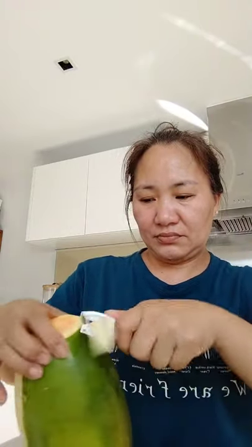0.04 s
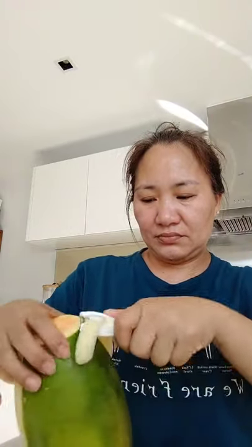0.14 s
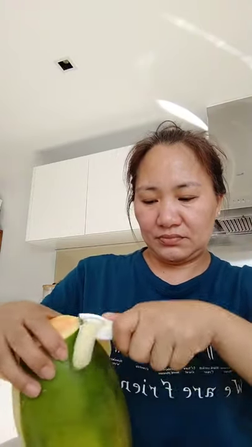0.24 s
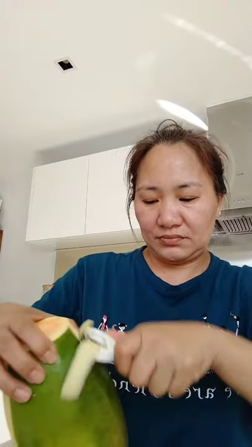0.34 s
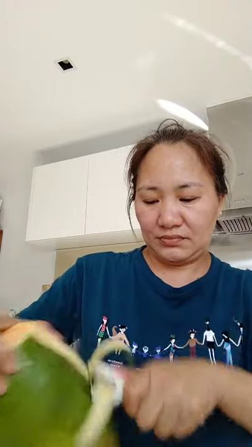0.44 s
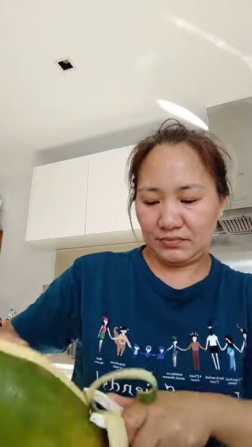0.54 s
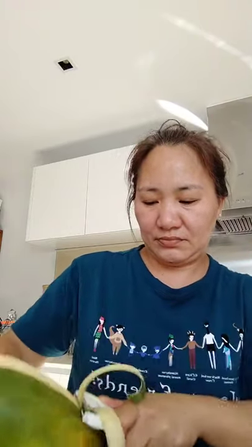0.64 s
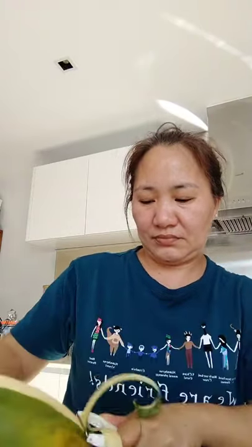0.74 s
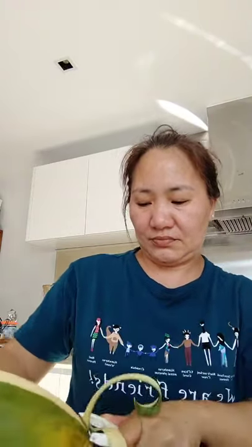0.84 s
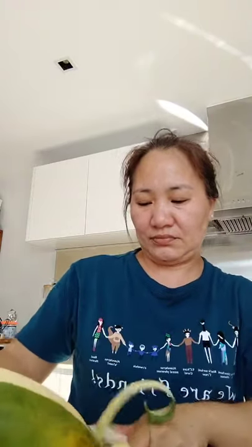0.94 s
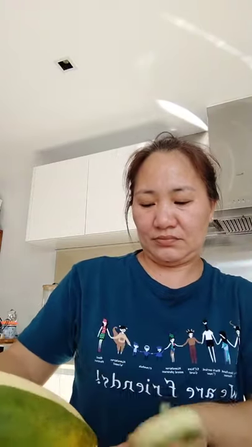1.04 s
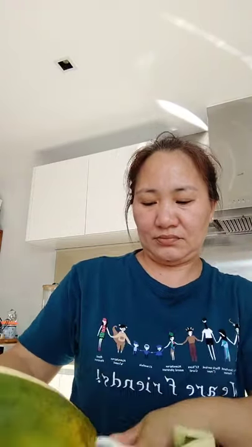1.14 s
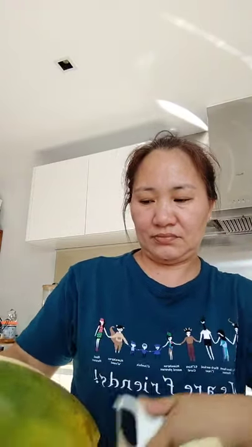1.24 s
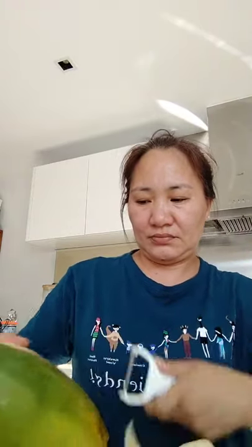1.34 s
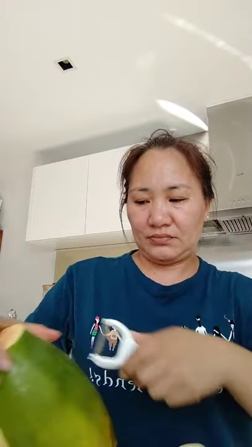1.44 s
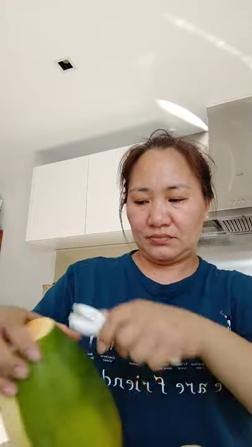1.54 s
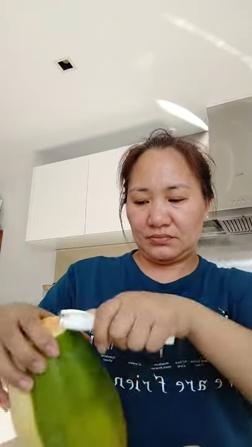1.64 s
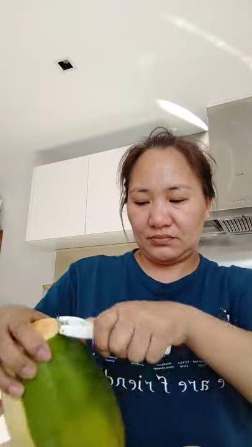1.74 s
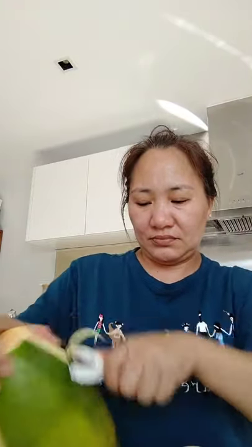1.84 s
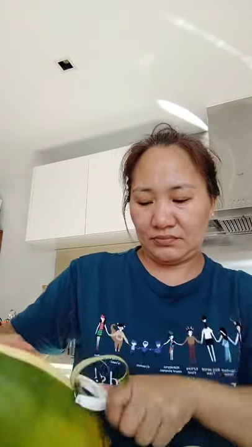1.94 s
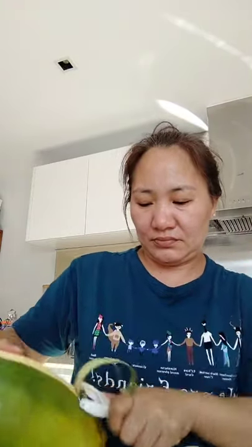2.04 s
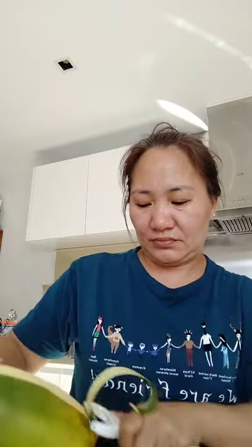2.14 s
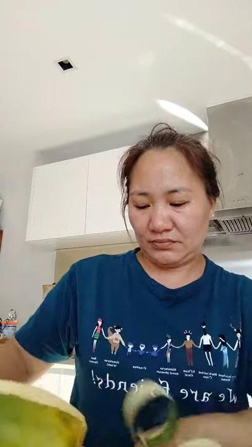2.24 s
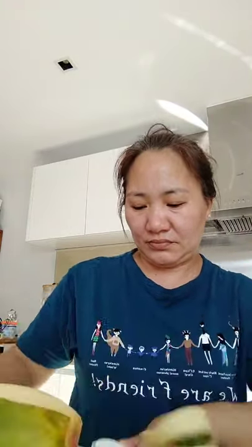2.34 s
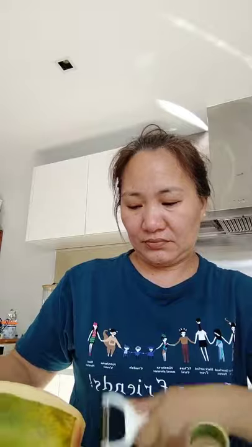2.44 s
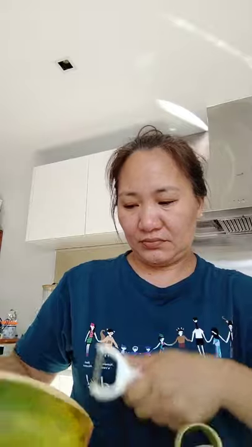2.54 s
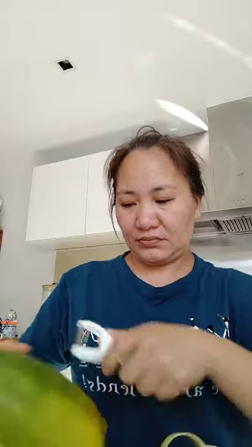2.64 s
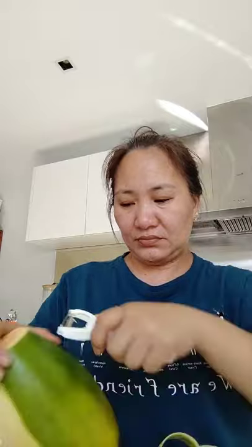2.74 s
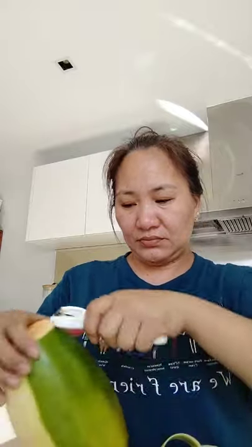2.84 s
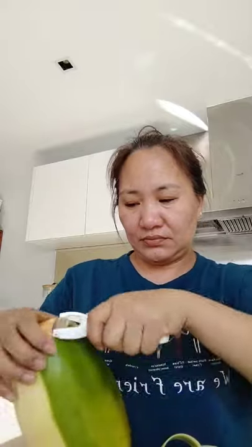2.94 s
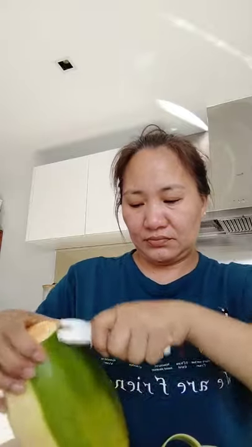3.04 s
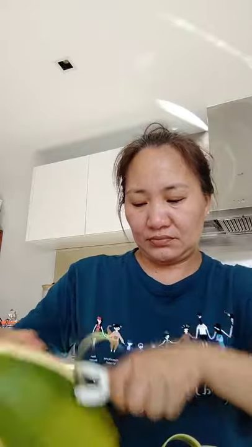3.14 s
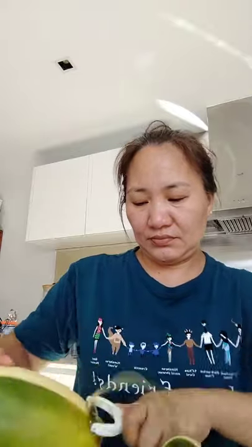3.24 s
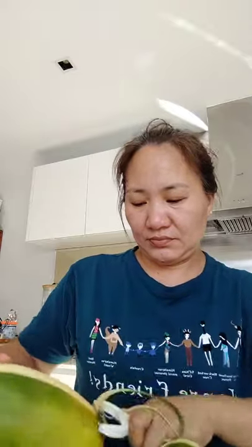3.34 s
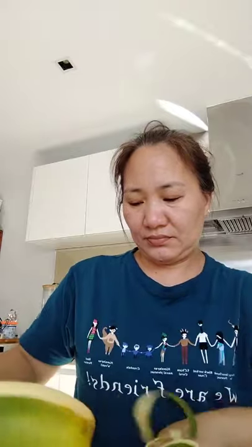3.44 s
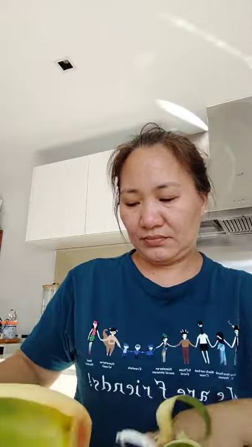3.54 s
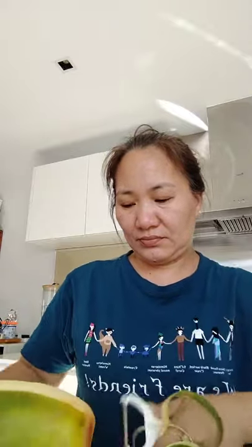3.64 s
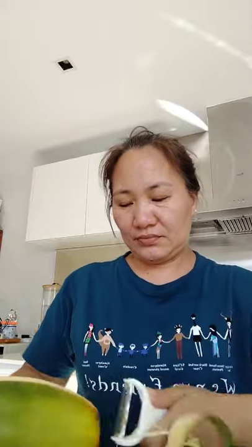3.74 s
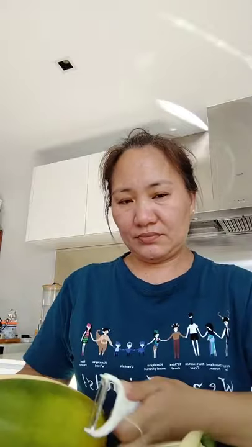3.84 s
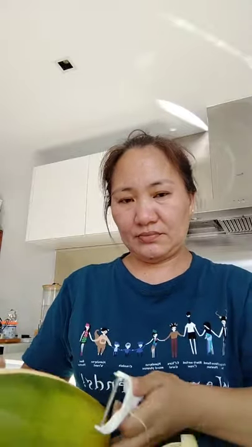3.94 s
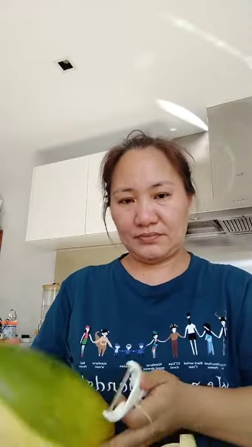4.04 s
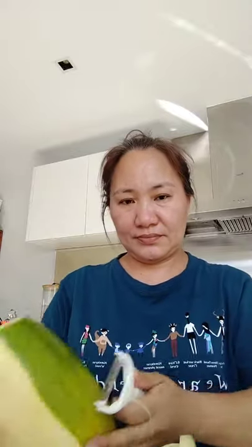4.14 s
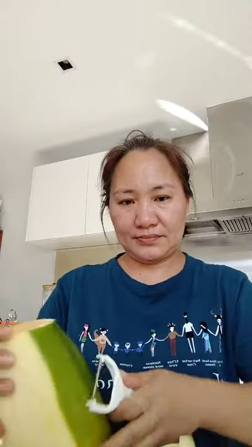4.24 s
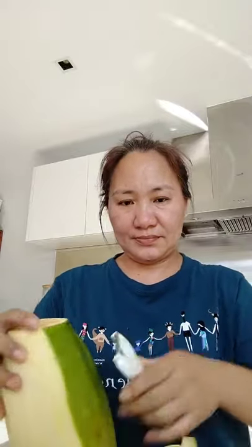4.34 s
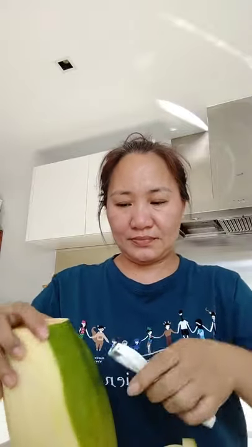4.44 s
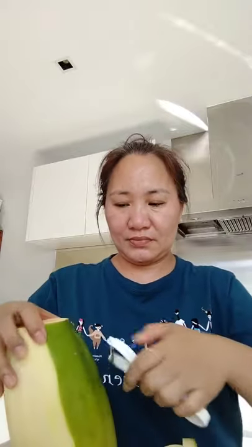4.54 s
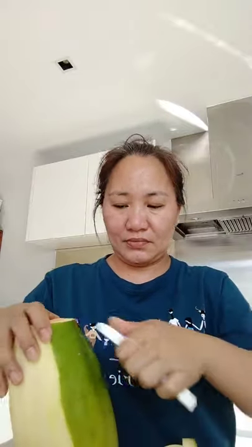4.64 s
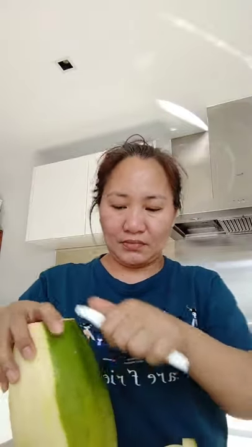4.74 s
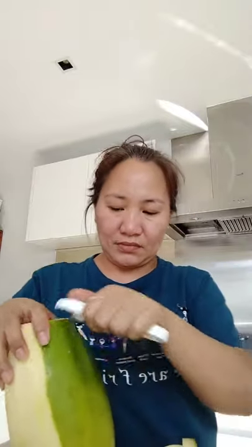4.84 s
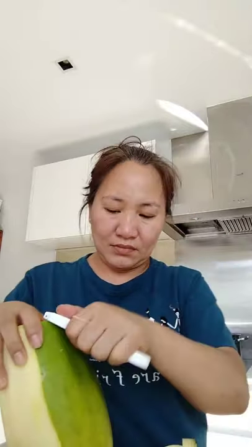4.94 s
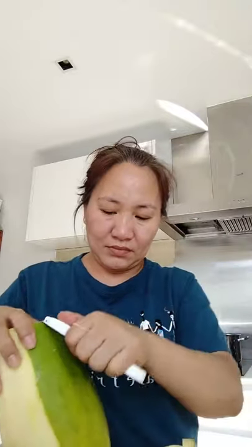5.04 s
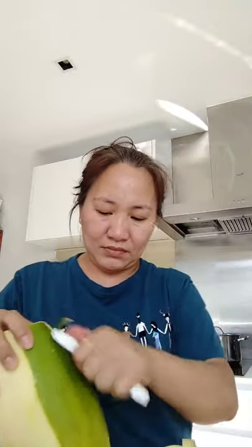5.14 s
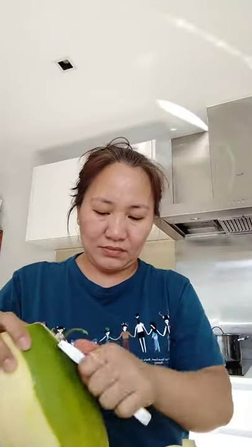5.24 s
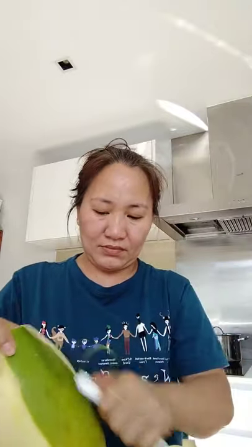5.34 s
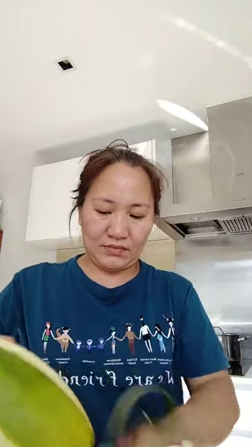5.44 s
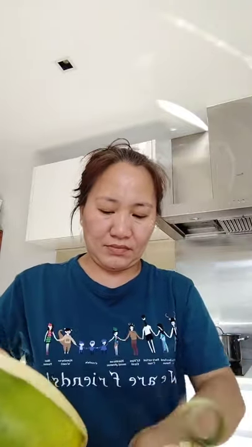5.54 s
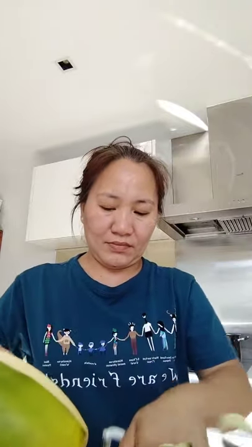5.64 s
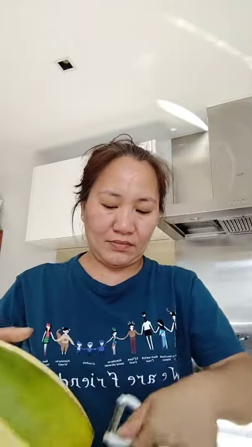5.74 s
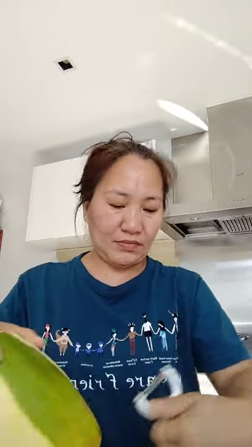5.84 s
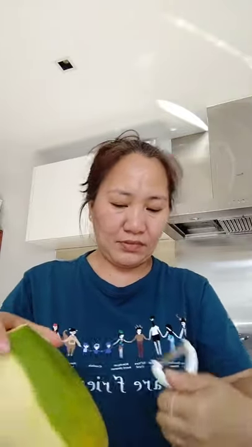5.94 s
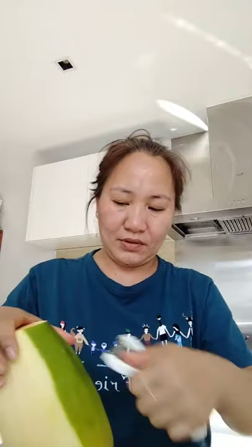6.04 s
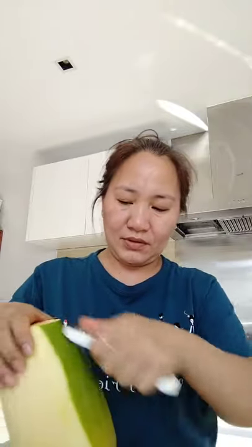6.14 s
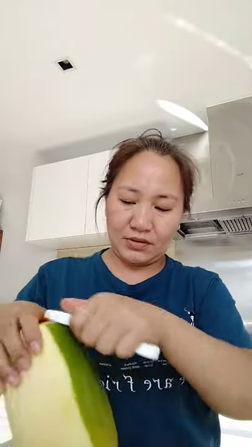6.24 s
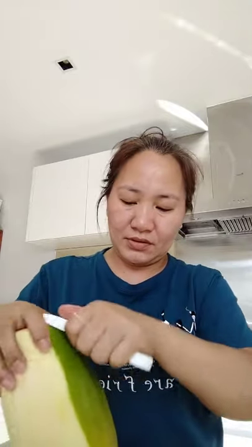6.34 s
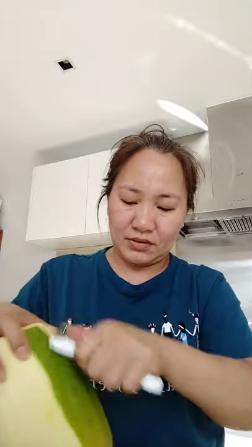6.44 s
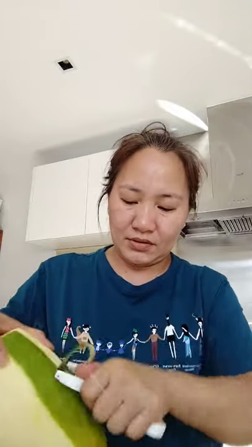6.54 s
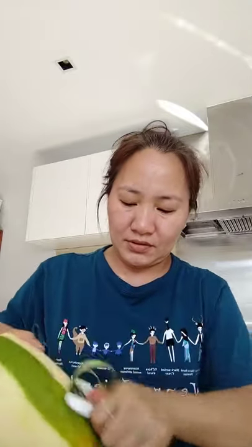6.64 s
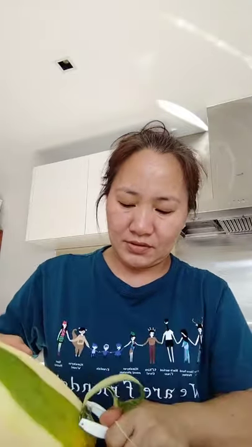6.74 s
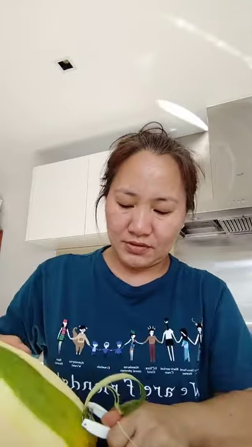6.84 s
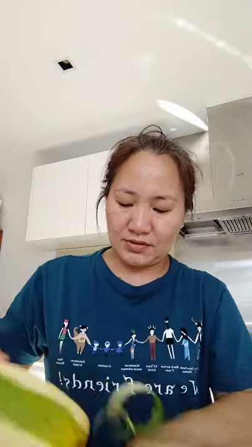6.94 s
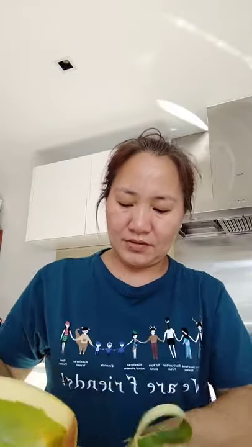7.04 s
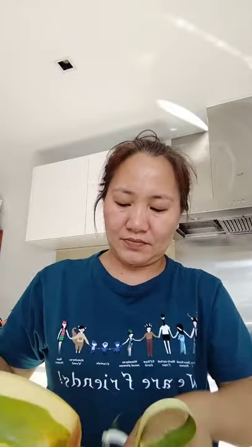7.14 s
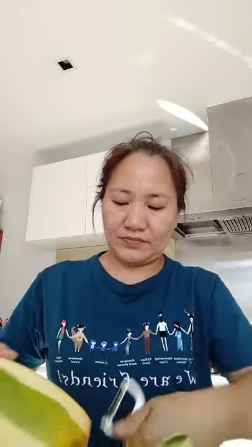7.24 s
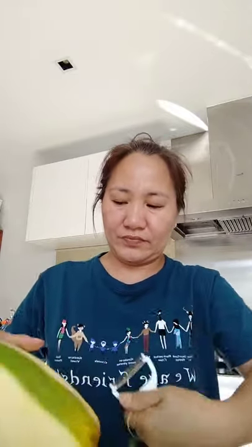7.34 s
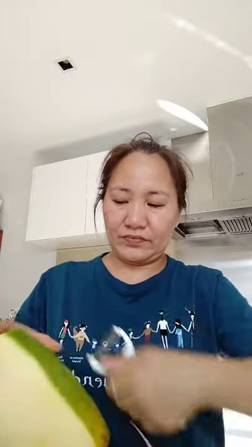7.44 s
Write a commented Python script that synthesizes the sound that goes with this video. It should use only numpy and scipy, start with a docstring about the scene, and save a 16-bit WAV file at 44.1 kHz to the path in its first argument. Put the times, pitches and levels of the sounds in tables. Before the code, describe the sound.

In a small, hard kitchen with a short echo, a faint fuzzy hum wavers low behind close peeling, captured in mono by a phone. A sharp tick at 0.2 s leads into a wet, grainy hiss from 0.4, strongest near 0.6, pushing unevenly until a handle knock and low thump at 1.1. Light finger taps follow. Ticks at 1.8 start a second scrape, ending in a brighter knock at 2.3. A third runs from 3.0 to a heavier double thump at 3.55. From 3.8 to 4.8 there is handling: soft rubbing, hollow taps, a bright snap and solid knock near 4.3, scattered ticks. A fourth stroke rasps in short pushes from 5.0 to a knock at 5.6, followed by soft palm rustle and a dull rocking bump. After ticks at 6.4, the final stroke scrapes in lower, squeakier pushes to the sharpest crack at 7.1, leaving quiet hum.

```python
"""Ticks, then a wet hiss in uneven pushes, then a knock: a hand peeler bites into a papaya, slides down the skin
and jumps free as the fruit thumps on the counter. Palms rub, fingers tap and an appliance hums low in a hard kitchen.
The hiss, rubbing and background are noise shaped by resonances, and taps and ticks are short noise bursts.
Knocks add fading sine waves to such bursts. Fading noise makes the echo, and a phone microphone hears it in mono."""
import sys
import numpy as np
from scipy import signal
from scipy.fft import rfft, irfft, next_fast_len
from scipy.io import wavfile
from scipy.ndimage import uniform_filter1d, map_coordinates

SR = 44100
rng = np.random.default_rng(int(sys.argv[2]) if len(sys.argv) > 2 else 0)


def to_linear_factor(level_db):
    """Convert decibel levels (scalar or array-like) to linear amplitude factors."""
    exponent = np.asarray(level_db, float) / 20
    return 10 ** exponent


def store_pcm(level_fs):
    """Save levels as 16-bit WAV."""
    pcm = np.round(np.clip(level_fs, -1, 1) * 32767).astype(np.int16)
    wavfile.write(sys.argv[1], SR, np.atleast_2d(pcm).T)


N = 331191  # samples, about 7.5 s

# How the appliance's hum wavers. Each row: time in seconds, level in dB.
HUM_LEVEL = [(0.0, -63), (0.98, -54), (1.94, -62), (2.38, -50), (3.07, -65), (3.64, -51.5), (3.83, -67.5),
             (4.08, -65), (4.48, -59), (5.06, -61.5), (5.63, -52), (6.55, -58), (7.19, -52.5), (7.51, -58)]
# Resonances of the hum. Each row: centre in Hz, width in Hz, strength in dB.
HUM_RESONANCES = [(280.6, 78.6, 0.5), (185.7, 73, -14.5), (382.4, 28, -16.5)]
# Colour of the low noise floor. Each row: frequency in Hz, relative strength in dB.
FLOOR_COLOUR = [(25, -13.5), (70, 8), (120, 5.5), (200, 3.5), (400, -16), (600, -5.5), (1000, -13.5),
                (1450, -10), (2200, -21), (3000, -23), (4000, -37), (9000, -25.5), (13000, -37),
                (16000, -29.5)]
# The faint narrow hiss. Each row: centre in Hz, width in Hz, strength in dB.
THIN_HISS = [(7480, 160, 0)]
FLOOR_DB, THIN_HISS_DB = -74, -85

# How long the kitchen rings. Each row: frequency in Hz, time to fade by 60 dB in seconds.
ROOM_FADE = [(100, 0.77), (400, 0.35), (1500, 0.46), (5000, 0.39), (15000, 0.49)]
# How loudly the kitchen answers. Each row: frequency in Hz, level in dB.
ROOM_LEVEL = [(100, -11), (500, 0.5), (2000, -7.5), (8000, -7), (15000, -8.5)]

# Hands shifting on the fruit, one list a spell. Each row: time in seconds, rubbing level in dB.
RUBS = [
    [(3.8, -98), (3.882, -66), (3.96, -97), (4.2, -99), (4.3, -78)],
    [(5.75, -63), (5.81, -60), (6.048, -74), (6.13, -64.5), (6.22, -71.5), (6.276, -66.5), (6.33, -67.5),
     (6.39, -65)],
]
RUB_HZ, RUB_ROAM_OCT = 1720, 0.22  # middle pitch, and how far it roams in octaves

# Fingers tapping the hollow handle. Each row: time in seconds, peak in dB, ring in Hz.
TAPS = [(.065, -73, 1126), (1.375, -67, 1425), (1.524, -65, 1454), (1.654, -69.5, 1164), (2.686, -72, 1400),
        (2.759, -69.5, 2530), (3.801, -57.5, 1400), (3.98, -52.5, 2170), (4.03, -68.5, 933),
        (4.067, -59.5, 4220), (4.125, -66, 4300), (4.222, -65, 1420), (4.595, -64.5, 1120),
        (4.63, -66.5, 737), (4.777, -54, 3120), (4.791, -65.5, 1890), (5.9, -58.5, 3410),
        (6.19, -61.5, 740)]

# Blade and peel ticks. Each row: time in seconds, scratch peak in dB, strongest ring in Hz,
# ring against scratch in dB, low side over high side in dB.
TICKS = [(.184, -28.5, 6840, -10, -4.5), (.396, -56.5, 6840, 6, -34), (.4364, -59, 6700, -4, -16),
         (1.7785, -32.5, 6300, -10, -2), (1.781, -30, 6740, -16, 1), (1.803, -34, 5100, -12, -19),
         (1.81, -38, 6720, -17, 10), (3.0476, -34, 6800, -13, -8), (3.0568, -34, 7550, -10, -2),
         (3.086, -36, 6700, -21, -12), (3.524, -35, 6640, 4.5, 18), (3.8258, -48.5, 7370, -18, 3),
         (3.8863, -44.5, 1350, -17.5, -8), (4.25, -49, 6650, -1, -3), (4.273, -53, 2960, -1, 9),
         (4.284, -46, 6760, -3, 17), (4.3278, -22.5, 6570, -5.5, 6), (4.474, -40, 1426, -9.5, 6),
         (4.594, -50, 8000, -7, 10.5), (4.6113, -53.5, 6800, -1, -6), (4.775, -46.5, 3180, -3, 3),
         (4.7882, -54, 1910, -13, 8), (5.014, -30.5, 2620, -5.5, 12), (5.0202, -52, 2100, -9, -13),
         (5.239, -45, 3350, -6, 26), (5.6096, -36, 1420, 0, -1), (6.339, -41, 2100, -11, 5),
         (6.409, -35, 2080, -7, 18), (6.4157, -34, 2250, -3, -13)]
EDGES_DB = -9.5  # low and high sides of a tick against its scratch, before the tilt between them

# Stroke ends and setting the fruit down. Each row: time in seconds, crack and handle setting in dB,
# thump peak in dB, knock setting in dB, brightness in dB, centre of the crack in Hz.
KNOCKS = [(1.0924, -22, -28, -32.5, -0.5, 3230), (2.3427, -21, -22.5, -31.5, 9, 2060),
          (3.5438, -16.5, -20.5, -25, -9, 1610), (3.5487, -14.5, -14, -51, -1.5, 1310),
          (4.3396, -10.5, -18, -24, -5.5, 1525), (5.5961, -8.5, -17, -25.5, -13, 1450),
          (7.0785, -0.5, -20.5, -26, -5, 1930)]
# Notes of the struck handle. Each row: pitch in Hz, strength in dB, time to fade by 60 dB in seconds.
HANDLE_NOTES = [(1447, -2, 0.014), (1886, 0, .012), (2276, -2, .012), (2665, -1.5, 0.012),
                (3380, -2.5, .01), (4260, -9.5, 0.0058)]
# Notes of the fruit on the counter. Each row: pitch in Hz, strength in dB, time to fade by 60 dB in seconds.
FRUIT_NOTES = [(94.4, -1.5, 0.14), (128.5, -7.5, 0.14), (142, 3.5, 0.061), (190, -8, 0.017)]
# Notes of the counter. Each row: pitch in Hz, strength in dB, time to fade by 60 dB in seconds.
COUNTER_NOTES = [(290, -1, 0.037), (373, -1, 0.033), (447, -2.5, .025), (620, -5.5, 0.022),
                 (840, -9, 0.012)]
# The fruit rocking softly on the counter. Each row: time in seconds, level setting in dB.
BUMPS = [(1.22, -62), (3.76, -57.5), (5.741, -52), (6.85, -52)]
# Notes of that rocking. Each row: pitch in Hz, strength in dB, time to fade by 60 dB in seconds.
BUMP_NOTES = [(70, 0, 0.37), (81, 0, 0.23)]

# Resonances of the blade. Each row: centre in Hz, width in Hz, strength in dB.
BLADE = [(4164, 1200, -3), (5320, 2500, -2), (6820, 1400, 1.5), (7620, 1100, -2.5), (8360, 2900, -7)]
# Resonances of the fruit's body. Each row: centre in Hz, width in Hz, strength in dB.
BODY = [(432, 170, -2.5), (666, 160, -4.5), (861, 140, -1)]
# Resonances of the handle. Each row: centre in Hz, width in Hz, strength in dB.
GRIP = [(1396, 620, 0), (1960, 650, -7.5), (2350, 1440, -1.5), (3232, 650, -3)]
# Resonances of the fine spray. Each row: centre in Hz, width in Hz, strength in dB.
SPRAY = [(10110, 3200, -16.5), (11980, 670, -11), (14300, 3100, -10), (15130, 590, -8)]

# How hard the blade cuts, one list a stroke. Each row: time in seconds, blade hiss level in dB.
CUT = [
    [(.36, -83), (.448, -51.5), (.542, -42.5), (.592, -38), (.626, -43), (.708, -81), (.75, -65.5),
     (.79, -49.5), (.85, -47), (.956, -91), (1.04, -58.5), (1.09, -52)],
    [(1.79, -61), (1.846, -76), (1.896, -54.5), (1.924, -47.5), (1.996, -40.5), (2.028, -45),
     (2.128, -63.5), (2.184, -47.5), (2.29, -48), (2.335, -44)],
    [(3.035, -58), (3.12, -64.5), (3.186, -49), (3.248, -39), (3.296, -38.5), (3.358, -44.5), (3.42, -79),
     (3.49, -53), (3.54, -43.5)],
    [(5.004, -56.5), (5.04, -61.5), (5.08, -70.5), (5.136, -51.5), (5.208, -79.5), (5.27, -45.5),
     (5.308, -51), (5.378, -70), (5.414, -48.5), (5.482, -42.5), (5.568, -45), (5.59, -58)],
    [(6.398, -60.5), (6.43, -56), (6.466, -80), (6.496, -53), (6.594, -46.5), (6.642, -46.5), (6.704, -60),
     (6.748, -48), (6.806, -44), (6.832, -50.5), (6.96, -78), (7.032, -48.5), (7.07, -50)],
]
# The colour of each push. Each row: start in seconds, handle against hiss in dB, fruit body against hiss in dB,
# handle ring at the start in Hz, blade hiss in Hz, squeak (how far the ring stands out) at the start in dB.
PUSHES = [(0.361, -5.5, -14, 3300, 6700, 9), (.74, 0, -6.5, 2353, 6550, -2.5),
          (0.969, 1, -43, 3380, 6520, 13.5), (1.78, -6.5, -11.5, 2970, 6900, -1.5),
          (2.13, -3, -5.5, 2400, 6550, 1), (3.03, -5.5, -14, 2400, 6850, 7.5),
          (3.429, -2, -2, 2550, 6600, 2.5), (5.001, 4, -21, 2380, 8400, 12),
          (5.21, -.5, -20.5, 2600, 8600, 7.5), (5.379, 0, -11.5, 2500, 7200, 5.5),
          (6.39, -0.5, -15, 2150, 7400, 7.5), (6.698, 2, -14, 1800, 6900, 9.5),
          (6.96, 6, -2, 1560, 6500, 10.5)]
FULL_CUT_DB = -42  # hiss level that counts as a full cut
SAG_OCT_PER_S = 4  # the handle's ring sinks, in octaves for each second of full cut
SQUEAK_FADE_DB_PER_S = 76  # the squeak blurs, in dB for each second of full cut
BODY_LAG_S, HANDLE_LAG_S = 0.016, 0.0027  # the heavy parts follow the cut late
SPRAY_DB, SPRAY_GROWS = -5, 0.99  # spray against a full-cut hiss; dB of spray for each dB of hiss
SPRAY_SHADE = 0.25  # dB of spray lost for each dB of handle: a tight grip covers the blade

LOW_CUT_HZ, TOP_HZ = 68, 15650  # what the microphone lets through


def unit(x):
    """Scales a sound to rms 1."""
    return x / np.sqrt(np.mean(x ** 2) + 1e-20)


def along(points, hz):
    """Reads a curve of (Hz, value) points on a log frequency axis."""
    point_hz, value = np.transpose(points)
    return np.interp(np.log(hz + 1), np.log(point_hz + 1), value)


def curves(tables):
    """Gives one value per sample for each column; the first, in dB, is near silent outside the tables."""
    t = np.arange(N) / SR
    seconds, *columns = np.transpose(np.concatenate(tables))
    out = [np.interp(t, seconds, column) for column in columns]
    on = sum((t >= rows[0][0]) & (t <= rows[-1][0]) for rows in tables)
    gate = uniform_filter1d(1. * on, size=300)  # soft edges
    out[0] = out[0] + 20 * np.log10(np.abs(gate) + 1e-6)
    return out


def wobble(rate):
    """Draws a smooth random curve through rate random points a second."""
    knots = rng.standard_normal(int(N * 200 / SR) + 4)
    return map_coordinates(knots, [np.arange(N) * np.clip(rate, .1, 199) / SR])


def late(x, lag_s):
    """Delays a curve by lag_s seconds."""
    return np.interp(np.arange(N) - lag_s * SR, np.arange(N), x)


def steady(x, span):
    """Evens out the slow level swings over span seconds, then scales to rms 1."""
    power = uniform_filter1d(x ** 2, size=int(span * SR))
    return unit(x / np.sqrt(np.abs(power) + 1e-12))


def humps(hz, modes):
    """Gives the gain of (Hz, width, dB) resonances excited independently, so that their powers add."""
    return np.sqrt(sum(to_linear_factor(db) ** 2 / (1 + ((hz - centre * centre / (hz + 1)) / width) ** 2) ** 3
                       for centre, width, db in modes))


def filtered(x, response):
    """Multiplies the spectrum of x by a response that depends on frequency."""
    size = next_fast_len(len(x) + 8192)
    return irfft(rfft(x, size) * response(np.fft.rfftfreq(size, 1 / SR)), size)[:len(x)]


def resonant(x, modes):
    """Colours x by fixed resonances."""
    return filtered(x, lambda hz: humps(hz, modes))


def gliding(x, modes, centre_hz, width, db):
    """Colours x by fixed resonances and one that moves; the overall gain is held while the colour changes."""
    hz, t, z = signal.stft(x, SR, nperseg=512)
    centre, db = (np.interp(t * SR, np.arange(N), curve + np.zeros(N)) for curve in (centre_hz, db))
    gain = humps(hz[:, None], modes + [(centre, width * centre, db)])
    gain = gain / np.linalg.norm(gain, axis=0)
    return signal.istft(z * gain, SR, nperseg=512)[1][:N]


def patchy(depth_db, wide, long):
    """Makes noise with patches of random gain, smoothed over wide bins and long frames."""
    z = signal.stft(rng.standard_normal(N + 512), nperseg=256)[2]
    field = uniform_filter1d(rng.standard_normal(z.shape), size=wide, axis=0)
    field = uniform_filter1d(field, size=long, axis=1)
    return unit(signal.istft(z * to_linear_factor(depth_db * unit(field)), nperseg=256)[1][:N])


def loose(modes, spread_db):
    """Gives the same resonances, each struck at a new strength."""
    return [(hz, width, db + spread_db * rng.standard_normal()) for hz, width, db in modes]


def burst(t, modes, rise, t60):
    """Sends noise through resonances, swelling up to time 0 and dying after it; peak 1."""
    swell = np.where(t < 0, np.exp(t / rise), to_linear_factor(-60 * t / max(t60, .003)))
    z = rfft(swell * rng.standard_normal(len(t)))
    # a blow excites all pitches about evenly
    even = uniform_filter1d(np.abs(z) ** 2, size=len(t) // 150) ** .4
    x = irfft(z / even * humps(np.fft.rfftfreq(len(t), 1 / SR), modes), len(t))
    x = x * signal.windows.tukey(len(t), .1)
    return x / np.abs(x).max()


def ring(modes, t, attack):
    """Strikes a thing: each note is a fading sine wave at a slightly new strength; peak 1."""
    x = sum(to_linear_factor(db + rng.normal(0, 2) - 60 * t / t60) * np.sin(2 * np.pi * hz * t) for hz, db, t60 in modes)
    fade_out = np.minimum(5 * (1 - t / t[-1]), 1)
    x = x * (1 - np.exp(-t / attack)) * fade_out
    return x / np.abs(x).max()


def add(track, s, x):
    """Mixes x into the track at time s."""
    part = track[round(s * SR):][:len(x)]
    part += x[:len(part)]


def background():
    """A fuzzy, wavering hum of resonant noise over a very low patchy floor and a thin hiss."""
    fuzz = to_linear_factor(2.6 * wobble(9.3))
    hum = unit(fuzz * resonant(rng.standard_normal(N), HUM_RESONANCES))
    floor = filtered(patchy(6.3, wide=1, long=30), lambda hz: to_linear_factor(along(FLOOR_COLOUR, hz)))
    hiss = resonant(patchy(4.5, wide=2, long=30), THIN_HISS)
    return to_linear_factor(curves([HUM_LEVEL])[0]) * hum + to_linear_factor(FLOOR_DB) * unit(floor) + to_linear_factor(THIN_HISS_DB) * unit(hiss)


def kitchen(x):
    """The walls answer with noise whose pitches die at their own speeds; a new tail each third of a second."""
    out, step = np.zeros(N + SR), SR // 3
    for i in range(0, N, step):
        hz, t, z = signal.stft(rng.standard_normal(int(.7 * SR)), SR, nperseg=256)
        fade = to_linear_factor(-60 * t / along(ROOM_FADE, hz)[:, None])
        fade = fade / np.sqrt(np.mean(fade ** 2, 1, keepdims=True))
        fade = fade * to_linear_factor(along(ROOM_LEVEL, hz))[:, None]
        tail = signal.istft(z * fade, SR, nperseg=256)[1] / np.sqrt(.7 * SR)
        tail = tail * (1 - np.exp(-np.arange(len(tail)) / SR / 0.0009))  # soft start
        add(out, i / SR + .006, signal.fftconvolve(x[i:i + step], tail))
    return out[:N]


def rubbing():
    """Palms and peel slide over the wet fruit: a soft patchy rustle whose main pitch roams."""
    db, = curves(RUBS)
    hz = RUB_HZ * 2 ** (RUB_ROAM_OCT * wobble(26))
    rustle = gliding(patchy(8.5, wide=1, long=36), GRIP + [(900, 300, -5)], hz, width=.15, db=4)
    return to_linear_factor(db) * steady(rustle, span=0.047)


def taps():
    """Fingers tap the hollow handle, a soft blow with no scratch: a rough ring and nearly its octave."""
    out, t = np.zeros(N), np.arange(-300, 7892) / SR
    for s, db, hz in TAPS:
        notes = [(hz, 0.13 * hz, 0), (1.98 * hz, 0.062 * hz, -9)]
        add(out, s + t[0], to_linear_factor(db) * burst(t, notes, 0.0015, .09))
    return out


def ticks():
    """Each tick is a short scratch of noise over the tool's colour, with a ring around one pitch."""
    out, t = np.zeros(N), np.arange(-300, 3796) / SR
    for s, db, hz, ring_db, tilt_db in TICKS:
        note = to_linear_factor(ring_db) * burst(t, [(hz, 0.11 * hz, 0)], 0.00053, 0.016)
        scratch = burst(t, loose(BLADE, spread_db=3.5), 0.00054, 0.016)
        low = to_linear_factor(tilt_db / 2) * burst(t, loose(GRIP[1:], spread_db=10.5), 0.0014, 0.026)
        high = to_linear_factor(-tilt_db / 2) * burst(t, SPRAY, .0009, 0.0069)
        tick = note + scratch + to_linear_factor(EDGES_DB) * (low + high)
        add(out, s + t[0] + .0005, to_linear_factor(db) * tick)
    return out


def knocks():
    """The handle cracks, the counter knocks and rattles, then the heavy fruit thumps; softer bumps rock it."""
    out, t = np.zeros(N), np.arange(SR // 4) / SR
    early = t - .01  # noise swells a little before the blow
    for s, db, thump_db, knock_db, bright_db, hz in KNOCKS:
        crack = burst(early, [(hz, 1.01 * hz, 0)], 0.0029, 0.013)
        crack = crack + to_linear_factor(bright_db) * burst(early, BLADE + SPRAY, 0.0042, 0.022)
        rattle = burst(early, [(276, 290, 6.7), (620, 1300, -5.5), (1400, 700, -9.5)], 0.01, 0.13)
        add(out, s + early[0] + 0.000932, to_linear_factor(db - 10.5) * crack + to_linear_factor(knock_db) * rattle)
        add(out, s, to_linear_factor(db - 13.0) * ring(HANDLE_NOTES, t, 0.00044))
        add(out, s - .002, to_linear_factor(knock_db + 3.5) * ring(COUNTER_NOTES, t, 0.0013))
        add(out, s + .005, to_linear_factor(thump_db) * ring(FRUIT_NOTES, t, 0.0017))
    for s, db in BUMPS:
        add(out, s, to_linear_factor(db) * ring(BUMP_NOTES, t, .05) * np.minimum(t / .05, 1))
    return out


def scrape():
    """Skin cells tear as dense grains; the cut stutters a little, and each part of the tool rings with it."""
    hiss_db, = curves(CUT)
    t = np.arange(N) / SR
    push = np.maximum(np.searchsorted(np.transpose(PUSHES)[0], t) - 1, 0)
    start, grip_db, body_db, grip_hz, blade_hz, squeak_db = np.array(PUSHES)[push].T

    # seconds of full cut so far, in all and within this push; lighter cutting counts for less
    work = np.cumsum(np.minimum(to_linear_factor(hiss_db - FULL_CUT_DB), 1)) / SR
    age = np.maximum(work - work[(start * SR).astype(int)], 0)
    grip_hz = grip_hz * 2 ** (-SAG_OCT_PER_S * age)
    squeak_db = squeak_db - SQUEAK_FADE_DB_PER_S * age

    tearing = to_linear_factor(0.19 * wobble(120) + 8.5 * rng.exponential(size=N) ** 0.41)  # shared by all parts
    grains = [tearing * patchy(5.5, wide=2, long=10) for _ in range(3)]  # wet patches
    gurgle = tearing * patchy(9.4, wide=1, long=14)  # the flesh answers in lumps
    blade = gliding(grains[0], BLADE, blade_hz, width=0.35, db=2.5)
    grip = gliding(grains[1], GRIP, grip_hz, width=.17, db=squeak_db)
    body = resonant(gurgle, BODY)
    spray = resonant(grains[2], SPRAY)

    grip_level = grip_db + late(hiss_db, HANDLE_LAG_S)
    body_level = body_db + late(hiss_db, BODY_LAG_S)
    spray_level = SPRAY_DB + FULL_CUT_DB + SPRAY_GROWS * (hiss_db - FULL_CUT_DB) - SPRAY_SHADE * grip_db
    parts = [(blade, hiss_db), (grip, grip_level), (body, body_level), (spray, spray_level)]
    return sum(to_linear_factor(db) * steady(x, span=0.063) for x, db in parts)


def scene():
    """Everything at the counter sounds near and again off the walls, over the background."""
    near = scrape() + ticks() + taps() + knocks() + rubbing()
    return np.tile(near + kitchen(near) + background(), (2, 1))


def band_limit(x):
    """A steep low-pass at the top of the band."""
    return signal.sosfilt(signal.butter(12, 16610, fs=SR, output="sos"), x)


def record(dry):
    """The microphone drops the deep bass and the top, and gives both channels the same sound."""
    def microphone(hz):
        low_cut = (1j * hz / (LOW_CUT_HZ + 1j * hz)) ** 3
        return low_cut / (1 + (hz / TOP_HZ) ** 160)

    mono = filtered(dry[0], microphone)
    return band_limit(np.array([mono, mono]))


dry = scene()
out = record(dry)
store_pcm(out)
```